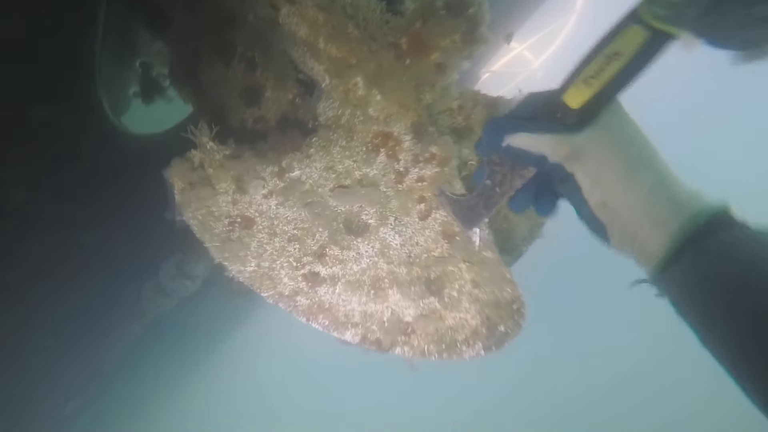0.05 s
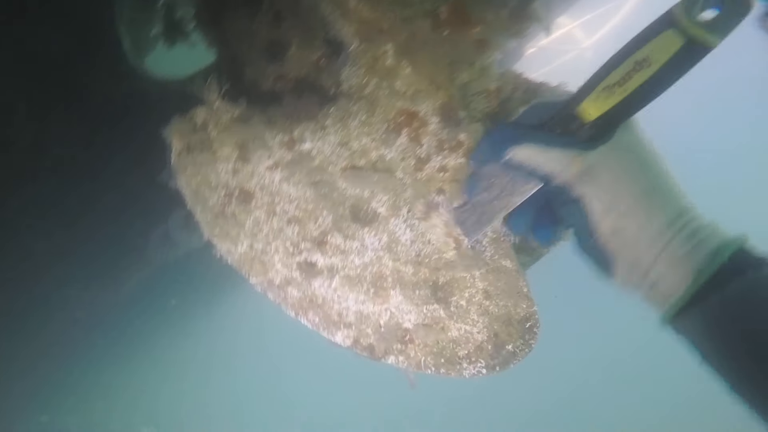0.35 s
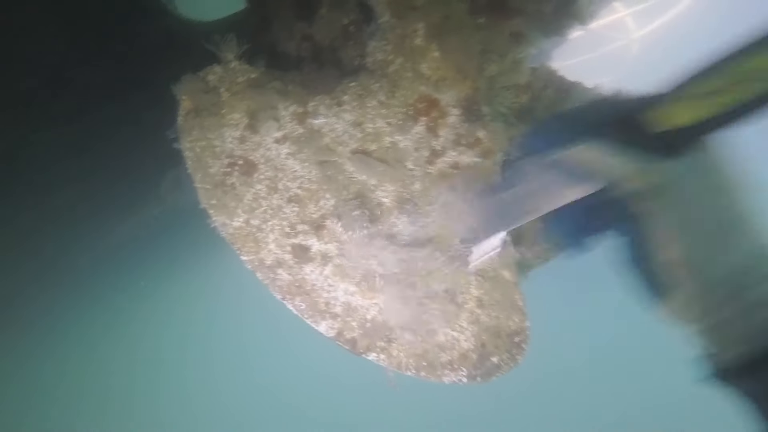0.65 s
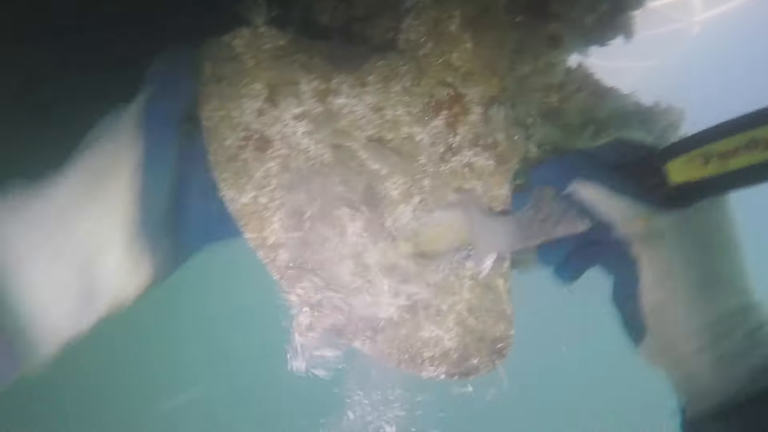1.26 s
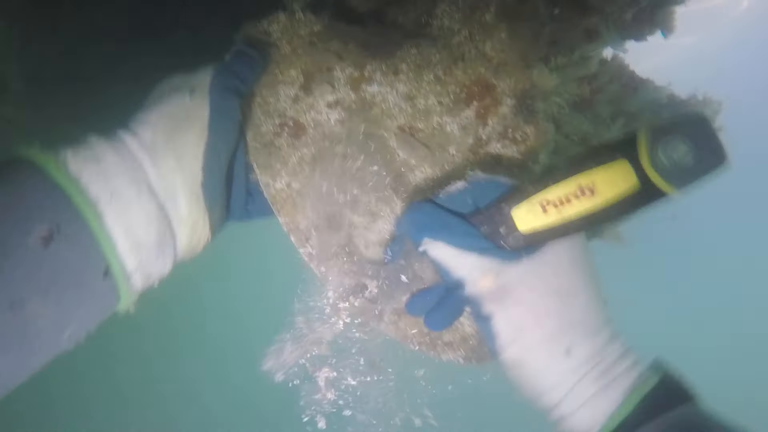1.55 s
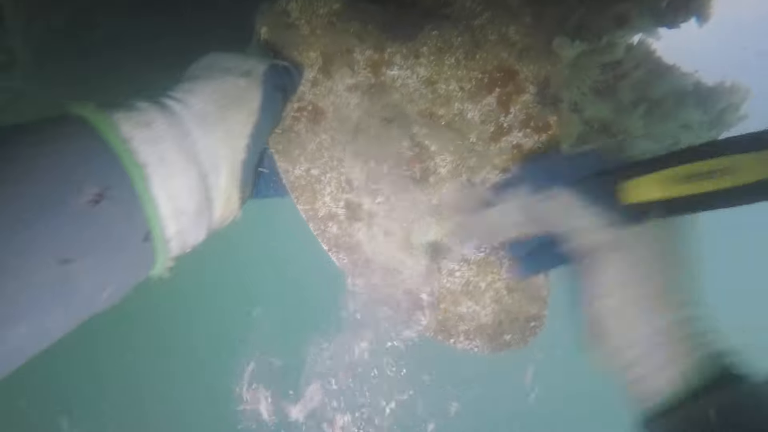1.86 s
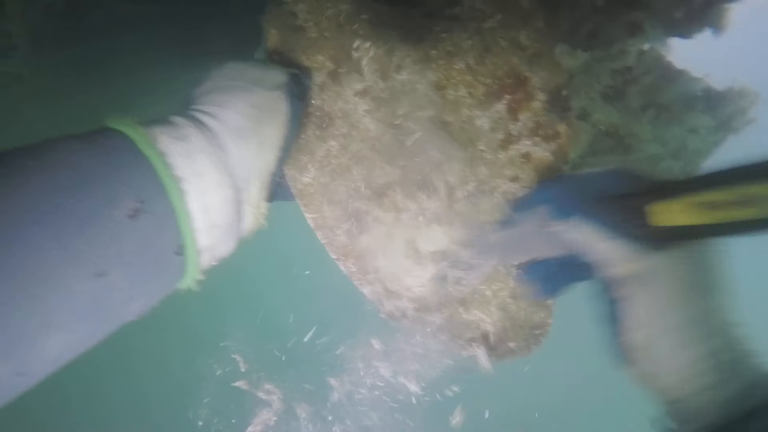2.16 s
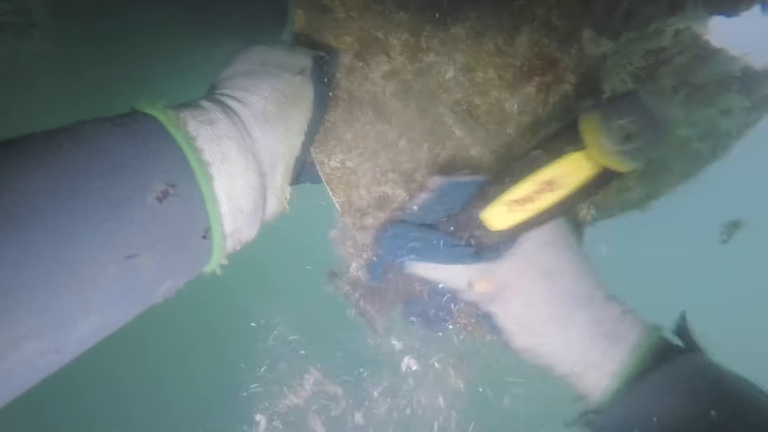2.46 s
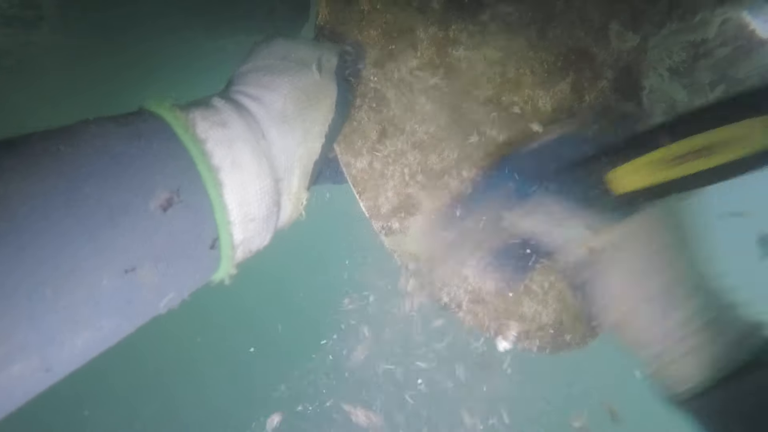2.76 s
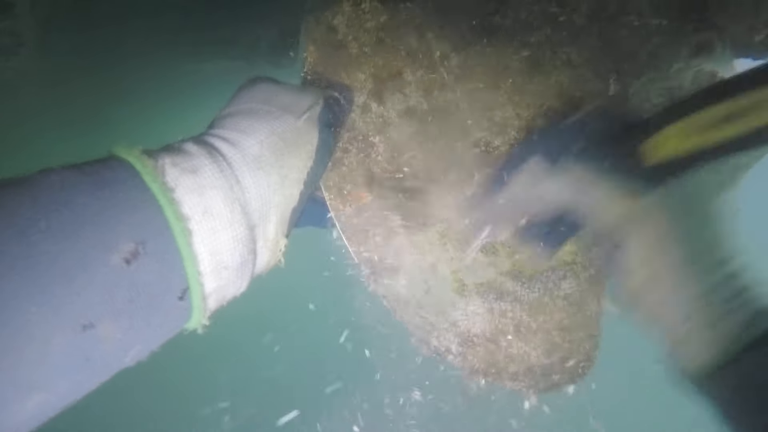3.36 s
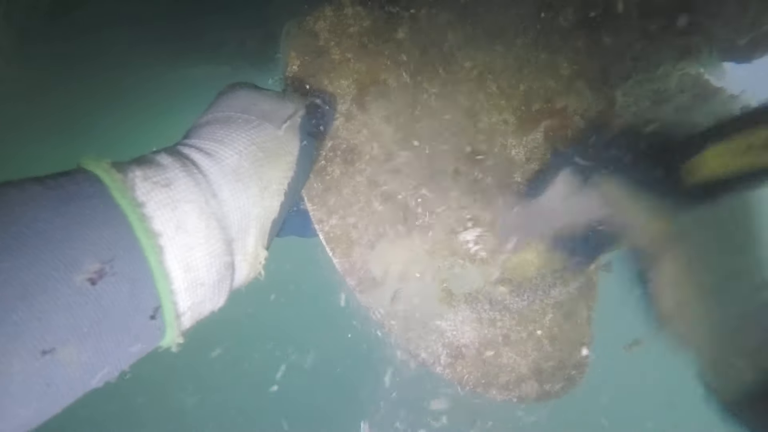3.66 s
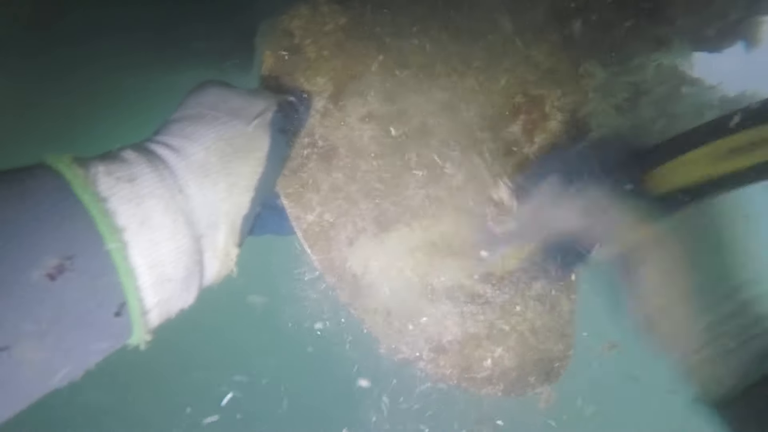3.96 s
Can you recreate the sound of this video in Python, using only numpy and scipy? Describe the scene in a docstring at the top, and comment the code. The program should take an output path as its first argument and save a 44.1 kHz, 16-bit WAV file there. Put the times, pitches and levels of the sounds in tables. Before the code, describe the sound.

A steel scraper rasps crust off a propeller blade, heard close underwater. Five separate crunchy strokes come at about 0.5, 1, 1.5, 2 and 2.4 seconds. From 2.7 seconds eight quick strokes follow, running to the end at 4 seconds. Chips snap off, most sharply near 1.5, 2 and 2.9 seconds. Hard pushes briefly ring the metal, with dull knocks and thumps over low water rumble and faint hiss.

```python
"""A steel scraper on a crusted propeller blade, heard under water from a camera housing.
Five separate strokes, then eight quick ones: the edge crushes the crust in countless tiny fractures
that ring scraper and blade, and bigger pieces snap off. Dull knocks and thumps reach the microphone
over the rumble of stirred water and a faint hiss."""
import sys
import numpy as np
from scipy import signal
from scipy.fft import rfft, irfft
from scipy.io import wavfile
from scipy.ndimage import uniform_filter1d

SR = 44100
rng = np.random.default_rng(int(sys.argv[2]) if len(sys.argv) > 2 else 0)


def master(y):
    """Save y as 16-bit WAV."""
    cut = np.clip(np.atleast_2d(y).T, -1, 1)
    pcm = np.round(cut * 32767)  # scale
    wavfile.write(sys.argv[1], SR, pcm.astype(np.int16))


N = 176400
T = np.arange(N) / SR
FFT_SIZE = 2 ** 18
HZ = np.maximum(np.arange(FFT_SIZE // 2 + 1) * SR / FFT_SIZE, 1)
BODY_EDGE_HZ, TREBLE_EDGE_HZ = 1370, 3320  # borders of the low, middle and treble bands
JUDDER_DB, JUDDER_HZ = 1.4, 85


def undb(db):
    """Decibels to gain."""
    return 10 ** (np.asarray(db) / 20)


def unit(x):
    """Scale to rms 1."""
    return x / np.sqrt(np.mean(x ** 2))


def colour(points, hz):
    """Gain along a spectrum of (f/Hz, level/dB) points."""
    f, db = np.array(points).T
    return undb(np.interp(np.log(hz), np.log(f), db))


def hump(hz, centre_hz, width_hz):
    """Gain of a steep-sided resonance."""
    return 1 / (1 + ((hz / centre_hz - centre_hz / hz) * centre_hz / width_hz) ** 2)


def causal(gain):
    """Spectrum with these gains that rings only after its cause (minimum phase)."""
    cepstrum = irfft(np.log(gain + 1e-6))
    cepstrum[1:len(cepstrum) // 2] *= 2
    cepstrum[len(cepstrum) // 2 + 1:] = 0
    return np.exp(rfft(cepstrum))


def noise(gain):
    """Noise of a given spectrum, rms 1."""
    return unit(irfft(rfft(rng.standard_normal(FFT_SIZE)) * gain)[:N])


def wander(rate_hz):
    """Random wandering with spread 1."""
    return noise(1 / (1 + (HZ / rate_hz) ** 4))


def add(out, start, sound):
    """Mix a sound in at its start time."""
    i = max(int(start * SR), 0)
    out[i:i + len(sound)] += sound[:max(N - i, 0)]


def water(low_cut_hz=15, swirl_db=2.2, swirl_hz=7.3):
    """Stirred water rumbles right against the housing."""
    # slow swell of the rumble: t/s, level/dB
    swell = [(0, -45.5), (0.199, -35.5), (.55, -24), (.78, -35), (1.12, -23), (1.45, -31.5), (1.9, -28),
             (2.3, -28), (3.45, -25)]
    # rumble spectrum: f/Hz, relative level/dB
    spectrum = [(25, 5), (40, -1.5), (80, -5.5), (100, -21), (160, -22.5), (300, -38), (650, -51.5),
                (2000, -75)]
    times, db = np.array(swell).T
    rumble = noise(colour(spectrum, HZ) / (1 + (low_cut_hz / HZ) ** 2))
    swirl = undb(swirl_db * wander(swirl_hz))
    return rumble * swirl * undb(np.interp(T, times, db))


def hiss(level_db=-65):
    """A faint, steady hiss behind everything, with a narrow peak in the treble."""
    # hiss spectrum: f/Hz, relative level/dB
    spectrum = [(2000, 2), (8200, -6.5), (8650, 2), (9100, -14), (15000, -18)]
    return undb(level_db) * noise(colour(spectrum, HZ))


def metal_response(hz, detune=0.017):
    """Scraper and blade struck at one place: each place tunes the resonances a little differently."""
    # broad spectrum of the fractures between the resonances: f/Hz, relative level/dB
    crunch = [(120, -27), (300, -7.5), (1150, -20.5), (1650, -9.5), (2850, -24), (5200, -15), (7100, -20.5),
              (11200, -21), (12800, -32), (15500, -34.5)]
    # resonances of scraper and blade: f/Hz, width/Hz, relative level/dB
    resonances = [(419.7, 30, -1.5), (606.7, 46, 4), (682, 39, 2.5), (935, 120, -2.5), (1462, 140, 2),
                  (2033, 154, 4), (2226, 257, 1), (2552, 170, -5), (3354, 393, 1.5), (3964, 350, -5),
                  (6080, 640, -6), (8054, 1040, -9.5), (9910, 930, -15)]
    power = colour(crunch, hz) ** 2
    for centre, width, db in resonances:
        tuned = centre * (1 + detune * rng.standard_normal())
        power += (undb(db) * hump(hz, tuned, width)) ** 2
    return causal(np.sqrt(power))


def fractures(size, per_s=3500, spread_db=3.5, bounce_s=0.0068, bounce_db=3.5, travel_hz=4.21):
    """Tiny fractures ring the metal as the edge travels: low, middle and treble bands, each rms 1."""
    hz = np.maximum(np.arange(size // 2 + 1) * SR / size, 1)
    t = np.arange(size) / SR
    clicks = (rng.random(size) < per_s / SR) * rng.choice([-1, 1], size)
    clicks = clicks * undb(spread_db * np.minimum(rng.exponential(size=size), 5))
    ringing = rfft(clicks) * metal_response(hz)
    for share in (np.cos, np.sin):  # waves bounce inside the blade from two places in turn
        bounces = rng.standard_normal(size) * np.exp(-t / bounce_s)
        bounces *= undb(bounce_db) / np.sqrt(np.sum(bounces ** 2))
        clicks_here = clicks * share(2 * np.pi * travel_hz * t)
        ringing += rfft(clicks_here) * rfft(bounces) * metal_response(hz)
    low = 1 / (1 + (hz / BODY_EDGE_HZ) ** 16)
    high = 1 / (1 + (TREBLE_EDGE_HZ / hz) ** 16)
    return [unit(irfft(ringing * band)) for band in (low, 1 - low - high, high)]


def rasp(db, treble_db, body_db, size=32768, body_follow=0.66, pivot_db=-28):
    """One contact of the edge: the middle band follows the curve db, the low resonances swell less."""
    low, middle, high = (band[:len(db)] for band in fractures(size))
    low_db = pivot_db + body_follow * (db - pivot_db) + body_db
    return low * undb(low_db) + middle * undb(db) + high * undb(db + treble_db)


def chips(rise_s=0.0033, size=8192):
    """Chips break off and the edge taps: sudden bursts of fractures, some milliseconds long."""
    # chips and taps: t/s, level/dB before the rise shapes it, length/s, treble offset/dB
    snaps = [(0.105, -43.5, 0.016, -7), (0.132, -40, 0.014, -11.5), (0.161, -44, 0.014, -11),
             (0.605, -48.5, 0.013, -0.5), (0.689, -42, 0.0065, -31), (0.733, -42, 0.0053, -3.5),
             (0.86, -36.5, 0.0051, 5), (1.13, -44.5, 0.021, -10.5), (1.385, -38.5, 0.0034, 4),
             (1.547, -18.5, 0.0084, -4.5), (2.007, -20, 0.02, -3), (2.211, -47, 0.0093, -27),
             (2.26, -48.5, 0.013, -25), (2.293, -42.5, 0.0063, 2), (2.393, -26.5, 0.007, 2),
             (2.423, -23, 0.019, 2.5), (2.529, -47.5, 0.018, -35), (2.735, -34, 0.0069, -10.5),
             (2.857, -21, 0.029, -8.5), (3.453, -27.5, 0.016, 2.5), (3.497, -33.5, 0.033, -12),
             (3.784, -27.5, 0.0077, 5), (3.904, -26.5, 0.0067, -0.5)]
    out, t = np.zeros(N), np.arange(size) / SR
    for start, db, length, treble_db in snaps:
        fade_db = 20 / np.log(10) * (t / length) ** 2
        burst = rasp(db - fade_db, treble_db, body_db=-6, size=size)
        add(out, start, burst * (1 - np.exp(-t / rise_s)))
    return out


def blade(contact, gain_db=-1):
    """The blade's long modes, shaken by noise that follows the low, heavy part of each contact."""
    # blade modes: f/Hz, t60/s, relative level/dB
    modes = [(121.6, 0.79, -3.5), (212, 0.23, -9), (410, 0.42, -13), (562.7, 0.24, -7.5),
             (609.1, 0.35, -10), (677.7, 0.39, -11.5), (870, 0.2, -14.5)]
    heavy = irfft(rfft(contact, FFT_SIZE) / (1 + (HZ / BODY_EDGE_HZ) ** 10))[:N]
    envelope = np.sqrt(np.abs(uniform_filter1d(heavy ** 2, size=256)))
    shaking = envelope * rng.standard_normal(N)
    t, ring = T[:SR // 2], 0
    for hz, t60, db in modes:
        mode = np.sin(2 * np.pi * hz * t) * np.exp(-np.log(1000) * t / t60)
        ring = ring + undb(db) * mode / np.sqrt(np.sum(mode ** 2))
    return undb(gain_db) * signal.fftconvolve(shaking, ring)[:N]


def separate_strokes(ease_s=0.029, ease_db=9):
    """Long pushes bite harder as they go and dull as they stop; each stroke has its own colour around 1.4 kHz."""
    # course of the rasp, one curve a stroke: t/s, level/dB
    strokes = [
        [(.175, -57), (.255, -44.5), (.285, -31.5), (.33, -31), (.357, -42.5), (.45, -26), (.552, -24),
         (.578, -47)],
        [(.862, -34.5), (.905, -38), (.93, -21), (.995, -27), (1.04, -21), (1.085, -31.5), (1.125, -49)],
        [(1.385, -51.5), (1.48, -37.5), (1.545, -28.5), (1.615, -36.5), (1.64, -46.5), (1.695, -58)],
        [(1.866, -49), (1.92, -39), (1.995, -29), (2.03, -39), (2.095, -53.5)],
        [(2.315, -60), (2.36, -41), (2.415, -40), (2.435, -24), (2.47, -27), (2.49, -64)],
    ]
    # tone offsets, one row a stroke: treble/dB, low resonances/dB, lower middle/dB
    tones = [(-8, -2.5, -9.5), (-10, -4.5, -5), (-5, -6.5, 1.5), (-2, -8.5, -2.5), (-1, -4.5, 2)]
    out = np.zeros(N)
    for stroke, (treble_db, body_db, middle_db) in zip(strokes, tones):
        times, db = np.array(stroke).T
        t = np.arange(times[0], times[-1], 1 / SR)
        easing = np.exp(-((times[-1] - t) / ease_s) ** 2)
        push = rasp(np.interp(t, times, db), treble_db - ease_db * easing, body_db)
        lower_middle = undb(middle_db * hump(HZ, centre_hz=1370, width_hz=620))
        add(out, times[0], irfft(rfft(push, FFT_SIZE) * lower_middle)[:len(t)])
    return out


def knocks():
    """Hand and handle knock: abrupt, unpitched rattles that reach the microphone dull through the water."""
    # knocks: t/s, level/dB, decay/s
    hits = [(0.691, -38.5, 0.022), (1.131, -28.5, 0.0098), (1.192, -39, 0.014), (1.317, -42.5, 0.019),
            (1.572, -31.5, 0.046), (1.787, -47.5, 0.027), (1.843, -39, .03), (2.014, -36, 0.037),
            (2.437, -31.5, 0.02), (2.674, -32.5, 0.01), (2.738, -33, .01), (2.968, -31, 0.019),
            (3.693, -26.5, 0.0085), (3.818, -27.5, 0.011)]
    force = sum(undb(db) * np.exp(-np.abs(T - start) / decay) * (T > start) for start, db, decay in hits)
    rattle = force * rng.standard_normal(N)
    band = unit(hump(HZ, centre_hz=333, width_hz=560) ** 2 / (1 + (HZ / BODY_EDGE_HZ) ** 10))
    return irfft(rfft(rattle, FFT_SIZE) * causal(band))[:N]


def thumps_and_blips(rise_s=0.0043):
    """Low thumps of the housing and two short, higher ringing blips, each dying away quickly."""
    # thumps and short blips: t/s, level/dB before the rise shapes it, f/Hz, decay/s
    pulses = [(0.868, -18, 64.8, 0.068), (1.059, -21, 209.3, 0.038), (1.082, -24.5, 117, 0.063),
              (1.131, -23.5, 382, 0.019), (1.191, -26.5, 620, 0.014), (1.558, -9, 63, 0.015),
              (1.809, -25.5, 123.8, 0.068), (2.01, -10, 54.5, 0.034), (2.019, -19.5, 128.4, 0.076),
              (2.165, -32.5, 202.5, 0.044), (2.428, -11, 60.7, 0.053), (3.496, -13, 77.8, 0.037),
              (3.818, -15, 53, 0.092)]
    out, t = np.zeros(N), T[:SR // 2]
    for start, db, hz, decay in pulses:
        envelope = np.exp(-t / decay) * (1 - np.exp(-t / rise_s))
        add(out, start, undb(db) * envelope * np.sin(2 * np.pi * hz * t))
    return out


def hollow_rings(swell_cycles=11.2, wobble_rad=0.56):
    """A hard push makes one resonance swell and die away, its pitch unsteady under the edge."""
    # rings on the hardest pushes: t/s, peak level/dB, f/Hz
    rings = [(1.058, -23, 955), (1.57, -28, 976), (1.935, -35.5, 608), (1.988, -32, 993),
             (2.428, -28.5, 979), (2.868, -26.5, 678), (3.185, -30, 964), (3.495, -30, 674),
             (3.5, -30.5, 926), (3.78, -27, 1458), (3.9, -34.5, 977)]
    out, wobble = np.zeros(N), wobble_rad * wander(JUDDER_HZ)
    for start, db, hz in rings:
        cycles = hz * np.maximum(T - start, 0)
        age = cycles / swell_cycles
        out += undb(db) * age * np.exp(1 - age) * np.sin(2 * np.pi * cycles + wobble)
    return out


def quick_strokes(speed_power=1.4, dulling_db=3):
    """The scraper goes to and fro: speed rises and falls in an arch and sets loudness and brightness."""
    # quick strokes: start t/s, fastest t/s, end t/s, level/dB at full speed
    strokes = [(2.744, 2.868, 2.915, -31), (2.916, 3, 3.085, -36), (3.082, 3.189, 3.253, -29.5),
               (3.263, 3.318, 3.397, -37.5), (3.39, 3.522, 3.533, -29.5), (3.541, 3.644, 3.708, -35.5),
               (3.697, 3.788, 3.852, -32.5), (3.867, 3.945, 4.01, -35)]
    out = np.zeros(N)
    for start, fastest, end, db in strokes:
        t = np.arange(start, end, 1 / SR)
        arch = np.interp(t, [start, fastest, end], [0, np.pi / 2, np.pi])
        speed = np.maximum(np.sin(arch), .01)
        level_db = db + speed_power * 20 * np.log10(speed)
        add(out, start, rasp(level_db, treble_db=dulling_db * (speed - 1), body_db=-6))
    return out


def scene():
    """At the housing, in mono: juddering strokes, chips, knocks, ringing metal, thumps, rumble and hiss."""
    strokes = separate_strokes() + quick_strokes()
    judder = undb(JUDDER_DB * wander(JUDDER_HZ))
    contact = strokes * judder + chips() + knocks()
    return (contact + blade(contact) + hollow_rings() + thumps_and_blips() + water() + hiss())[None]


def record(dry):
    """The camera cuts the top steeply above 15250 Hz."""
    return signal.sosfilt(signal.ellip(10, .2, 80, 15250, fs=SR, output="sos"), dry)


dry = scene()
out = record(dry)
master(out)
```